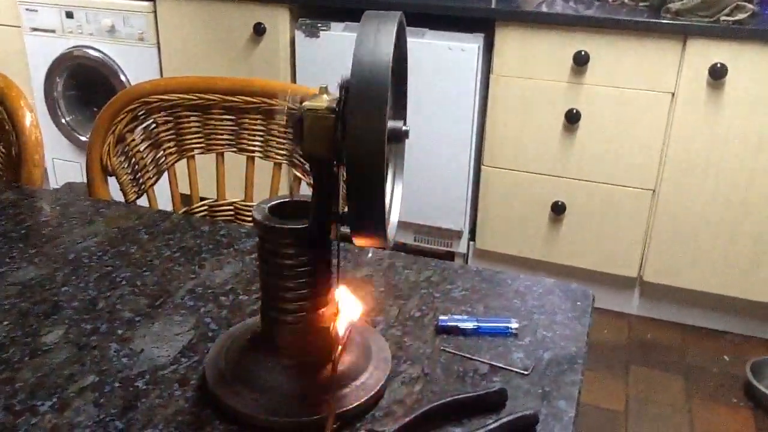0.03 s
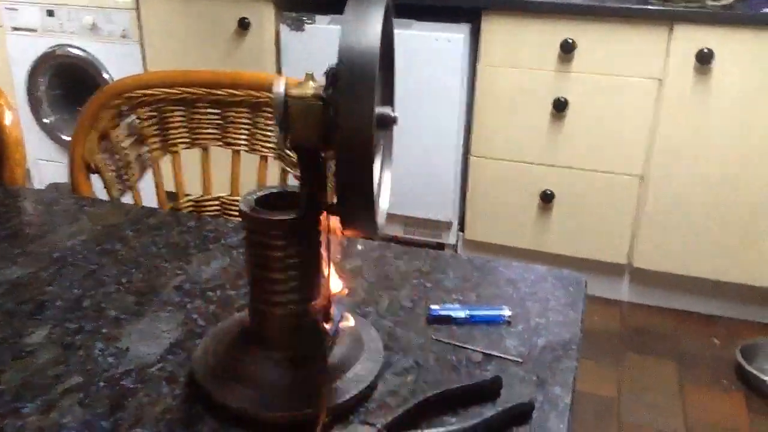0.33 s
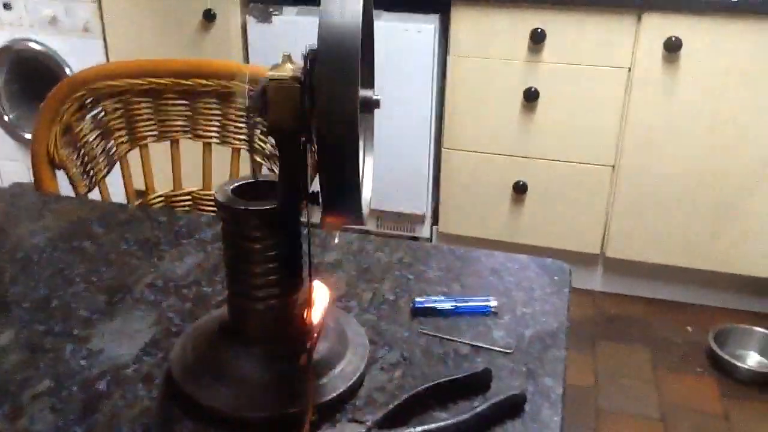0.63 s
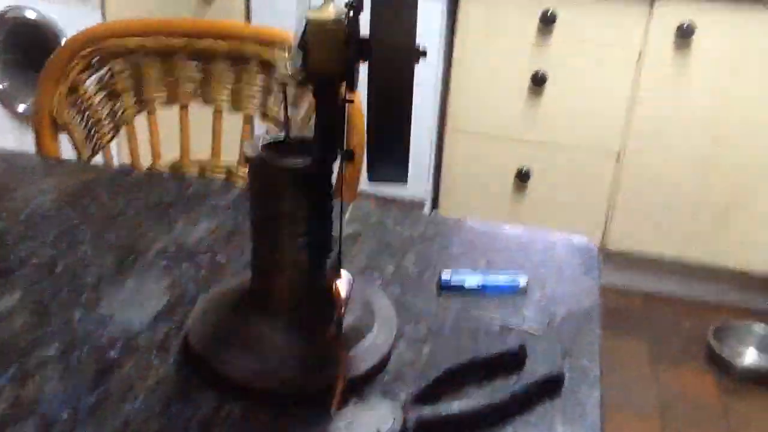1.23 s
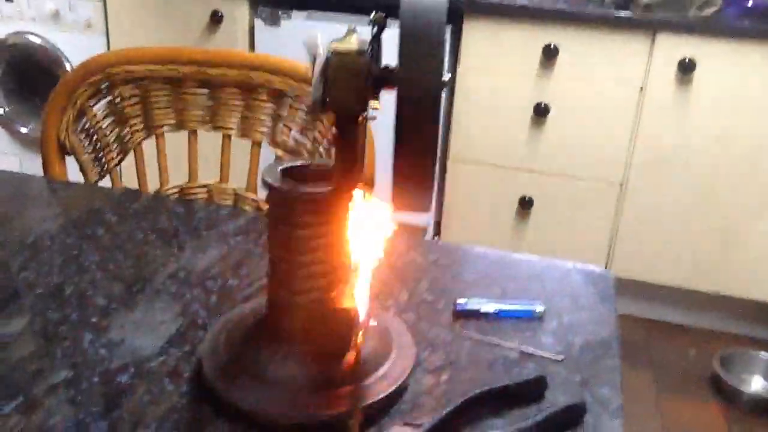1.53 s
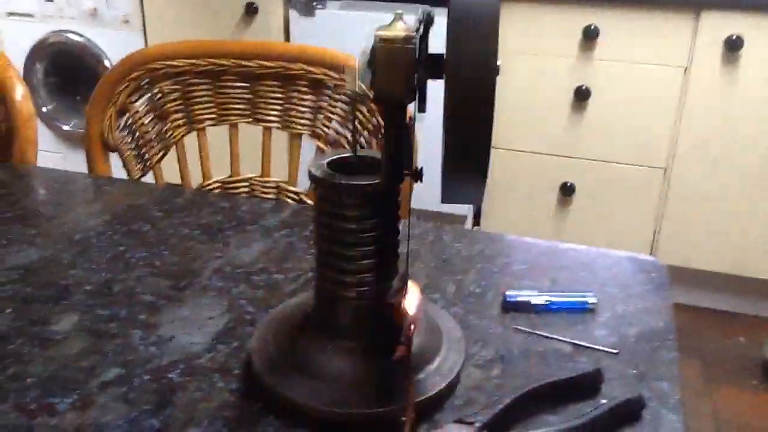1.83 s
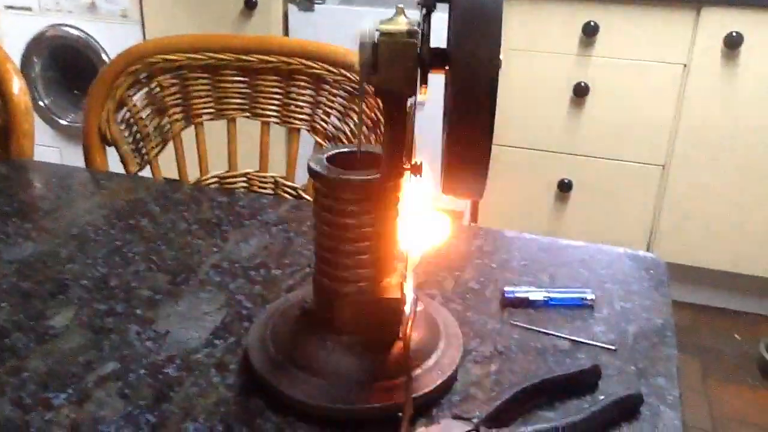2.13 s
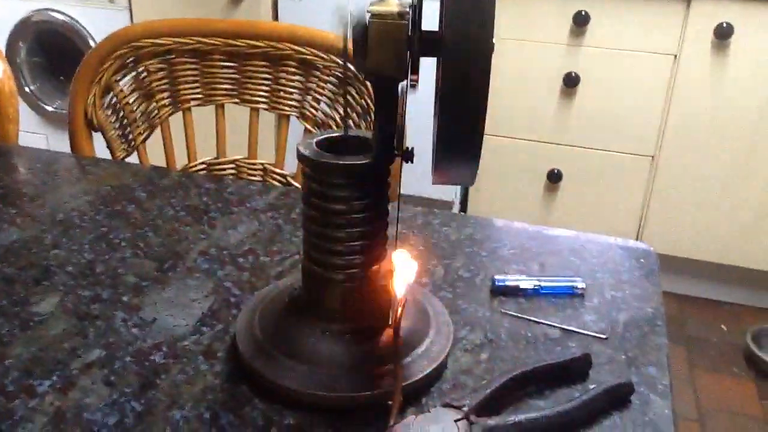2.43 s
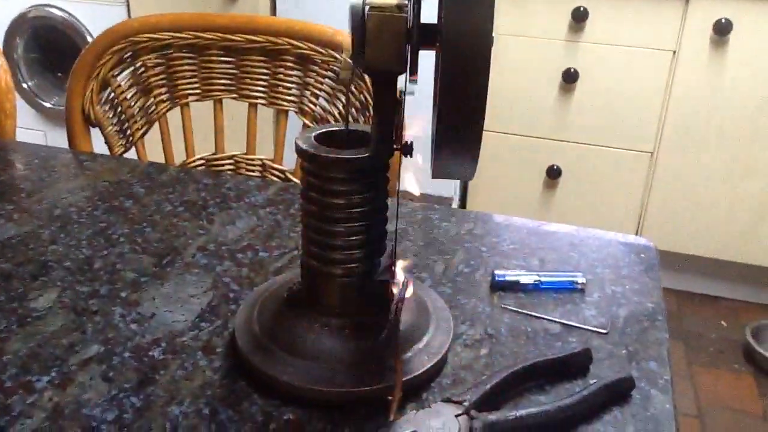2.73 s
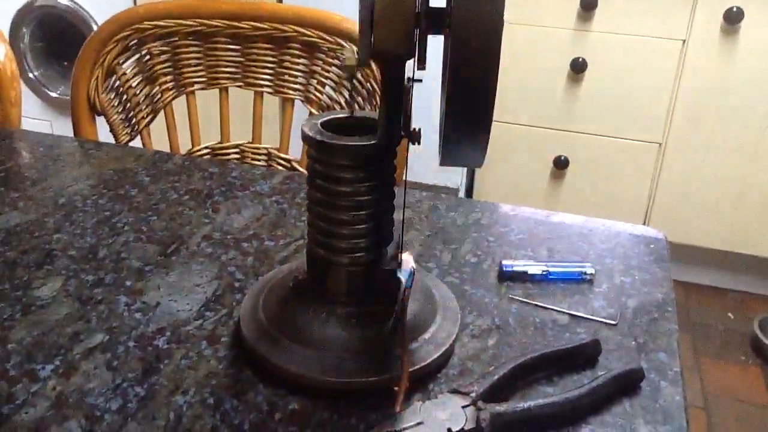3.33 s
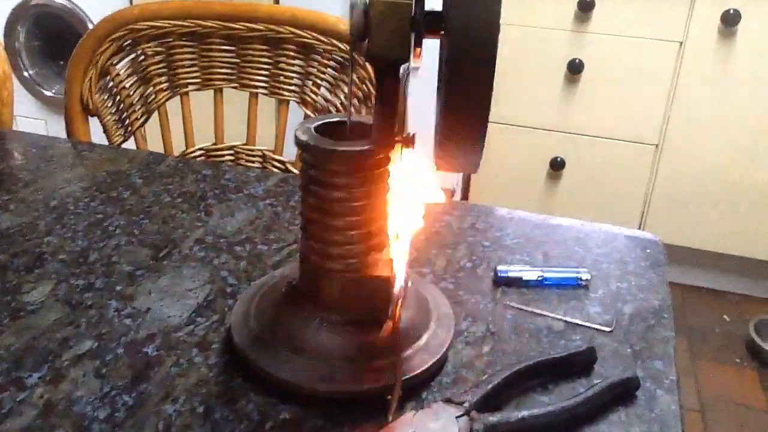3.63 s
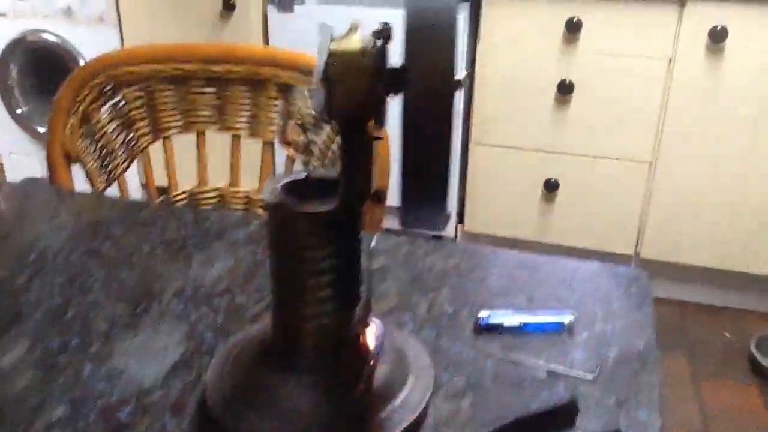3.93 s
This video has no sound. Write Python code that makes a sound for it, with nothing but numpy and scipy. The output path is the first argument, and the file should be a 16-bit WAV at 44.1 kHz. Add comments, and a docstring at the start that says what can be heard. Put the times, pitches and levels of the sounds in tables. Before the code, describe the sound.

Close up in a hard-walled kitchen, a small flame-driven engine runs steadily throughout. Its quick puffs and pops vary in strength, joined by valve clacks, a hissing piston and faint rattling over quiet room noise.

```python
"""A kitchen, close to a small flame-licker engine running on the stone worktop, about five turns a second.
Each turn the shutter scrapes open with a soft puff, the cylinder pops, the valve clacks and gas cracks out.
Then the piston slides with a hiss and the port hums as it draws in the flame.
Loose parts tick now and then; the hard room answers over a quiet steady background."""
import sys
import numpy as np
from scipy import signal
from scipy.fft import rfft, irfft
from scipy.io import wavfile

SR = 44100
rng = np.random.default_rng(int(sys.argv[2]) if len(sys.argv) > 2 else 0)


def bounce(signal):
    """Save signal as a 16-bit WAV file at the path given by the first command-line argument."""
    frames = np.transpose(np.atleast_2d(signal))
    limited = np.clip(frames, -1, 1)
    pcm = np.round(limited * 32767).astype(np.int16)
    wavfile.write(sys.argv[1], SR, pcm)


N = 176400
T = np.arange(N) / SR
TURN_S, FULL_POP_DB = .19, -14  # usual turn, full-strength pop


def undb(db):
    """Decibels to gain."""
    return 10 ** (np.asarray(db) / 20)


def unit(x):
    """Scale to rms 1."""
    return x / np.sqrt(np.mean(x ** 2))


def noise(colour, rings=()):
    """Noise of rms 1, shaped by a spectrum and optional resonances."""
    f = np.arange(N // 2 + 1) * SR / N + 1e-3
    hz, db = np.array(colour).T
    gain = undb(np.interp(np.log(f), np.log(hz), db))
    lift = 1 + sum(undb(peak) / (1 + (2 * (f - centre) / width) ** 2) for centre, width, peak in rings)
    return unit(irfft(rfft(rng.standard_normal(N)) * gain * lift, N))


def walk(rate_hz):
    """Random wander, spread near 1."""
    knots = rng.standard_normal(4096)
    return np.interp(T * rate_hz, np.arange(len(knots)), knots)


def age(start):
    """Seconds since start, zero before."""
    return np.maximum(T - start, 0)


def turns():
    """Current turn: length/s, and time into it in usual turns."""
    starts = np.array(STROKES)[:, 0]
    index = np.maximum(np.searchsorted(starts, T) - 1, 0)
    lengths = np.diff(starts, append=starts[-1] + TURN_S)
    return lengths[index], (T - starts[index]) / TURN_S


def harshness(db_per_s=139):
    """A slow turn builds more pressure, so it barks and cracks harder."""
    length, _ = turns()
    return undb(db_per_s * (length - TURN_S))


def swell(at, spread):
    """One smooth rise and fall per turn; arguments in usual turns."""
    _, share = turns()
    return np.exp(-((share - at) / spread) ** 2 / 2)


# Background spectrum: f/Hz, level/dB
BACKGROUND = [(30, -51), (167, -4), (426, 0), (497, -5), (953, -4), (1560, -22), (5030, -25), (9390, -15.5),
              (15000, -30)]
def background():
    """Quiet, steady room noise."""
    return undb(-53.5) * noise(BACKGROUND)


def burst(t, hz, rise_hz_per_s, peak_s, sharpness, crest_s, ring=0):
    """Gas rings the cylinder, rising in pitch as the cavity shrinks; a pressure spike tops the swell."""
    top_hz = 958 * (1 + .023 * rng.standard_normal())
    pitch = np.minimum(hz + rise_hz_per_s * t, top_hz)
    cycles = np.cumsum(pitch * np.diff(t, prepend=0))
    body = (t / peak_s * np.exp(1 - t / peak_s)) ** sharpness
    tail = ring * (1 - np.exp(-(t / .0037) ** 2)) * np.exp(-t / .0051)
    spike = undb(-5.5) * np.exp(-((t - crest_s) / .00037) ** 2)
    return spike - np.sin(2 * np.pi * cycles) * (body + tail)


# Engine turns, relative levels: t/s, puff/dB, pop/dB, shutter/dB, piston/dB
STROKES = [(-0.0115, -20, -20, -40.5, -45), (0.1633, -22.5, -20, -37.5, -48),
           (0.3615, -23.5, -27, -40.1, -45), (0.5641, -24, -29, -39, -45),
           (0.7736, -24.5, -23.5, -38.5, -47), (0.993, -22, -14.5, -37, -45.5),
           (1.2033, -20, -13.5, -33.5, -45.3), (1.4007, -22.5, -13, -36, -44),
           (1.5994, -22.5, -13.5, -36, -46), (1.7935, -22.0, -21, -36.5, -45.6),
           (1.9864, -24, -16, -37.5, -44), (2.1826, -22.5, -14.5, -37, -45),
           (2.3762, -19.0, -12.3, -35, -43.5), (2.5602, -20.5, -13, -37, -42.5),
           (2.7496, -21.5, -23.5, -39.5, -44.0), (2.939, -20, -15.5, -36.5, -45),
           (3.1287, -22, -21.5, -37.5, -43.5), (3.3218, -20.5, -23.5, -38, -44.0),
           (3.5284, -21.5, -12.0, -35, -45), (3.7231, -19.5, -13.2, -35, -41),
           (3.9094, -21, -16, -38.5, -45)]
# Turbulent gas spectrum: f/Hz, level/dB
BARK = [(100, -10), (200, 2), (350, 3), (550, -5), (800, 2), (1020, 0), (1400, -14), (2000, -21),
        (4000, -26)]
def chugs(pop_delay_s=.0162, puff_crest_s=.00328, pop_crest_s=.0022, base_hz=147):
    """The shutter puffs, the cylinder pops; both rock the base and leave a bark of turbulent gas."""
    out, bark = np.zeros(N), np.zeros(N)
    for start, puff_db, pop_db, _, _ in STROKES:
        span = slice(*np.searchsorted(T, [start, start + TURN_S]))
        puff_t = T[span] - start
        stretch = 1 + .018 * (FULL_POP_DB - pop_db)  # weak pops run slower
        pop_t = np.maximum(puff_t - pop_delay_s, 0) / stretch
        puff = burst(puff_t, hz=162.4, rise_hz_per_s=65000, peak_s=.0025, sharpness=3.3,
                     crest_s=puff_crest_s)
        pop = burst(pop_t, hz=199.5, rise_hz_per_s=155400, peak_s=.0016, sharpness=2.96,
                    crest_s=pop_crest_s, ring=undb(-1.5))
        out[span] += undb(puff_db - 1) * puff + undb(pop_db - 3) * pop
        for db, t, crest_s in ((puff_db, puff_t, puff_crest_s),
                               ((puff_db + pop_db) / 2, pop_t, pop_crest_s)):
            rocking = np.sin(2 * np.pi * base_hz * t) * np.exp(-t / .0054)
            out[span] += undb(puff_db - 13.5) * rocking
            bark[span] += undb(db - 14) * np.minimum(t / crest_s, 1) * np.exp(-t / .018)
    return out + bark * harshness() * noise(BARK)


# Shutter hiss spectrum: f/Hz, level/dB
SHUTTER_HISS = [(700, -3), (1500, -9.5), (3000, -11), (5000, -7.5), (8000, 1), (10000, -1), (12700, -4),
                (15200, -4)]
# Sliding metal resonances: f/Hz, width/Hz, level/dB
SLIDE_RINGS = [(2640, 110, 8), (4195, 150, 6), (6160, 120, 1.5), (7420, 70, -3), (9450, 390, -2.5)]
def shutter_scrape(attack_s=.0034, hold_s=.035, decay_s=.024, lag_s_per_db=.00035):
    """The shutter scrapes across the port, later on turns with a weak pop."""
    envelope = np.zeros(N)
    for start, _, pop_db, shutter_db, _ in STROKES:
        t = age(start + .00043 + lag_s_per_db * (FULL_POP_DB - pop_db))
        fade = np.exp(-np.maximum(t - hold_s, 0) / decay_s)
        envelope += undb(shutter_db - 1.24) * np.minimum(t / attack_s, 1) * fade
    return envelope * noise(SHUTTER_HISS, SLIDE_RINGS)


def thud(hz=167.3, decay_s=.016):
    """One dull thud at the start."""
    t = age(.0011)
    return undb(-23.5) * np.sin(2 * np.pi * hz * t) * np.exp(-t / decay_s)


CLACK_DELAY_S = .0183
# Valve and frame modes: f/Hz, level/dB, t60/s
VALVE_MODES = [(1354, -2, 0.14), (1917, 0.5, .05), (2600, -5.5, 0.071), (2652, -3, 0.22), (2740, -2, 0.21),
               (2817, -3, 0.14), (3640, 0, 0.036), (4160, -31, 0.049), (7230, -5, 0.091), (13300, 6, .06),
               (13650, 3, 0.045)]
def valve_clacks(scatter_db=5, detune=.0041):
    """Each pop throws the valve against its seat; each blow shares its force differently among modes."""
    out = np.zeros(N)
    for start, _, pop_db, _, _ in STROKES:
        span = slice(*np.searchsorted(T, [start, start + 2 * TURN_S]))
        t = np.maximum(T[span] - start - CLACK_DELAY_S, 0)
        for hz, db, t60 in VALVE_MODES:
            force, offset = rng.standard_normal(2)
            gain = undb(pop_db - 29.5 + db + scatter_db * force)
            fade = np.exp(-np.log(1000) * t / t60)
            out[span] += gain * fade * np.sin(2 * np.pi * hz * (1 + detune * offset) * t)
    return out


# Gas crack spectrum: f/Hz, level/dB
CRACK = [(600, -8), (1250, 5), (2000, -1), (3650, -4.5), (5500, -15)]
# Sizzle resonance: f/Hz, width/Hz, level/dB
SPIT_RING = [(13700, 600, 11)]
def exhaust(direct_s=.0192, reflected_s=.0249, crack_decay_s=.0041, spit_peak_s=.0022):
    """Escaping gas cracks, straight and again off the worktop, and spits a gritty sizzle."""
    crack, spit = np.zeros(N), np.zeros(N)
    for start, _, pop_db, _, _ in STROKES:
        for delay_s, db in ((direct_s, -32.5), (reflected_s, -21.5)):
            t = age(start + delay_s)
            crack += undb(pop_db + db) * (t > 0) * np.exp(-t / crack_decay_s)
        rise = age(start + CLACK_DELAY_S) / spit_peak_s
        spit += undb(pop_db - 21) * rise * np.exp(1 - rise)
    crack *= harshness() * noise(CRACK)
    spit *= undb(3.5 * walk(2000)) * noise(SHUTTER_HISS, SPIT_RING)
    return crack + spit


# Bright hiss spectrum: f/Hz, level/dB
EARLY_HISS = [(2200, -4.5), (3700, -11), (4600, 2.5), (5900, -9), (10000, -0.5), (15000, -8)]
# Its envelope: t/s, level/dB
EARLY_HISS_LEVEL = [(.01, -48), (.08, -41), (.31, -45), (.38, -54.5)]
def early_hiss():
    """A bright hiss that lasts for the first two turns."""
    times, db = np.array(EARLY_HISS_LEVEL).T
    return undb(np.interp(T, times, db, right=-np.inf)) * noise(EARLY_HISS)


def rattle(hits_per_s=28, decay_s=.0041):
    """Play in the linkage: faint, uneven ticks at random moments."""
    hits = (rng.random(N) < hits_per_s / SR) * rng.random(N)
    envelope = signal.lfilter([1], [1, -np.exp(-1 / (decay_s * SR))], hits)
    return undb(-46.5) * envelope * noise(CRACK)


# Piston hiss spectrum: f/Hz, level/dB
PISTON_HISS = [(700, -2.5), (1400, -9), (1850, 1), (2700, -10), (5000, -5.5), (8000, 1), (10000, -2.5),
               (12700, -6.5), (15200, -8)]
def piston_rub():
    """The piston rubs along the bore once a turn."""
    starts, *_, piston_db = np.array(STROKES).T
    db = np.interp(T, starts + TURN_S / 2, piston_db) - 2.73 + 2.7 * walk(45)
    return undb(db) * swell(at=.57, spread=.3) * noise(PISTON_HISS, SLIDE_RINGS)


# Indrawn flame spectrum: f/Hz, level/dB
RUSH = [(60, -27), (110, -14.5), (170, -1), (300, -3), (450, -3.5), (750, 2), (980, -1), (1300, -10),
        (2000, -23), (5000, -36)]
def intake(hum_top_hz=433):
    """The flame rushes in; the port hums at a pitch that climbs and levels off."""
    length, share = turns()
    rush = undb(-47 + 2 * walk(30.08)) * swell(at=.58, spread=.18) * noise(RUSH)
    pitch = (hum_top_hz - 602 * (share - .85) ** 2) * (1 + .03 * walk(150))
    hum = np.sqrt(2) * np.sin(2 * np.pi * np.cumsum(pitch) / SR)
    hum_db = -46 - 244 * (length - TURN_S) + 2.3 * walk(80)  # a slower turn draws less air
    return rush + undb(hum_db) * swell(at=.78, spread=.16) * hum


# Linkage ticks: t/s, level/dB, f/Hz, width/Hz, decay/s
TICKS = [(.899, -46, 6900, 6000, 0.013), (1.614, -26.5, 4200, 3000, 0.0037),
         (1.692, -30, 1340, 400, 0.0028), (1.692, -34.5, 2540, 600, 0.003),
         (2.347, -38, 2700, 1700, 0.0083), (3.44, -46, 1850, 400, 0.013), (3.662, -44, 2580, 2500, 0.02),
         (3.791, -39.5, 2190, 2010, 0.023)]
def loose_parts():
    """The linkage ticks and scrapes in short bursts of resonant noise."""
    out = np.zeros(N)
    for start, db, hz, width, decay_s in TICKS:
        t = age(start)
        b, a = signal.iirpeak(hz, hz / width, fs=SR)
        band = signal.lfilter(b, a, rng.standard_normal(N))
        band = signal.lfilter(b, a, band)
        out += undb(db) * (t > 0) * np.exp(-t / decay_s) * unit(band)
    return out


# Near reflections: delay/s, level/dB
ECHOES = [(.0065, -16.5), (0.0243, -15)]
# Reverberation bands: f/Hz, level/dB, t60/s
TAIL = [(139, -7.5, 0.32), (327, -7, 0.26), (536, -11, 0.33), (1090, -6.5, 0.43), (2700, -5.5, 0.29),
        (7000, -10, 0.4), (14000, -8, 0.23)]
def kitchen(x, onset_s=.005):
    """Adds echoes from worktop and cupboards, then a short dense tail."""
    t = T[:SR // 2]
    log_f = np.log(np.arange(len(t) // 2 + 1) * SR / len(t) + 1)
    centres = np.log(np.array(TAIL)[:, 0])
    scatter = np.exp(2j * np.pi * rng.random(len(log_f)))
    response = np.zeros(len(t))
    for weights, (_, db, t60) in zip(np.eye(len(TAIL)), TAIL):
        band = irfft(scatter * np.interp(log_f, centres, weights), len(t))
        fade = np.exp(-np.log(1000) * t / t60) * np.clip(t / onset_s - 1, 0, 1)
        response += undb(db) * unit(fade) * band
    echoes = sum(undb(db) * np.interp(T - delay, T, x, left=0) for delay, db in ECHOES)
    return x + echoes + signal.fftconvolve(x, response)[:N]


def scene():
    """The engine in the kitchen, over the background."""
    engine = chugs() + thud() + valve_clacks()
    grit = undb(1.5 * walk(900))
    engine += grit * (shutter_scrape() + piston_rub())
    engine += intake() + exhaust() + loose_parts() + rattle()
    return (kitchen(engine) + early_hiss() + background())[None]


def record(dry, low_cut_hz=108, top_hz=15400):
    """A small microphone drops the deep bass and the very top."""
    thin = signal.sosfiltfilt(signal.butter(4, low_cut_hz, "high", fs=SR, output="sos"), dry)
    return signal.sosfilt(signal.ellip(10, .2, 80, top_hz, fs=SR, output="sos"), thin)


dry = scene()
out = record(dry)
bounce(out)
```